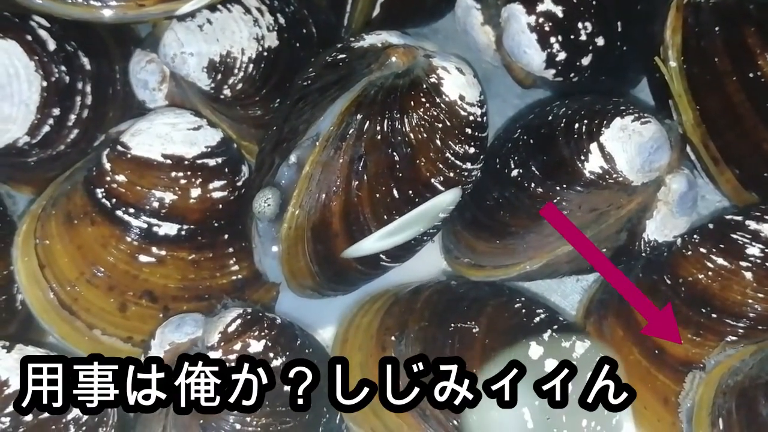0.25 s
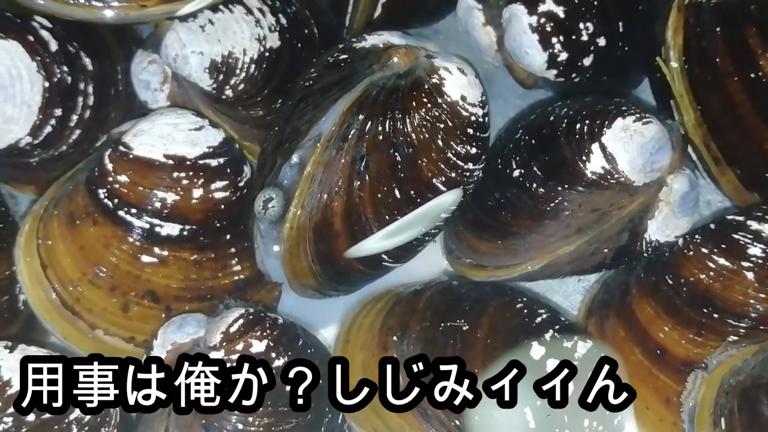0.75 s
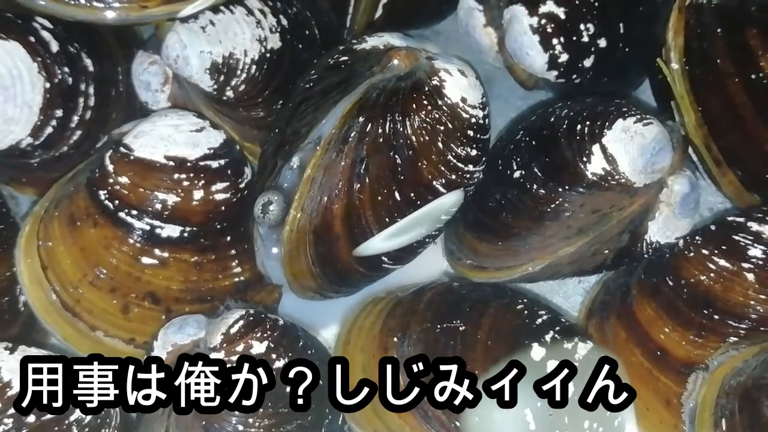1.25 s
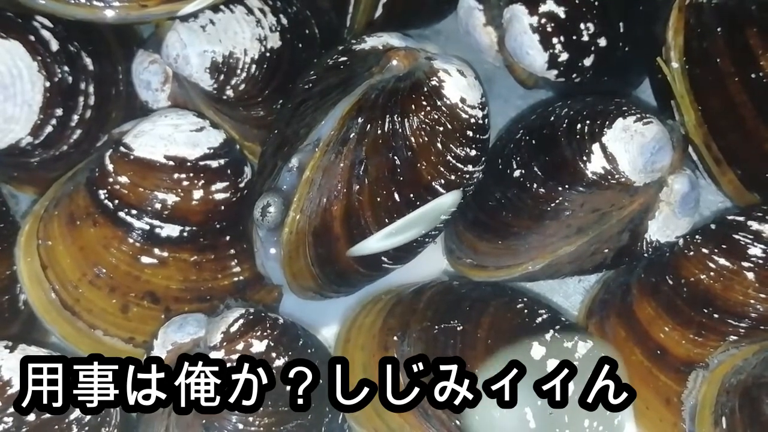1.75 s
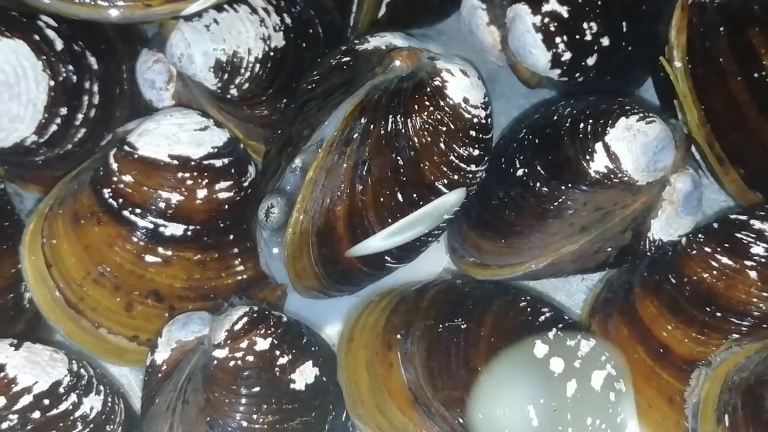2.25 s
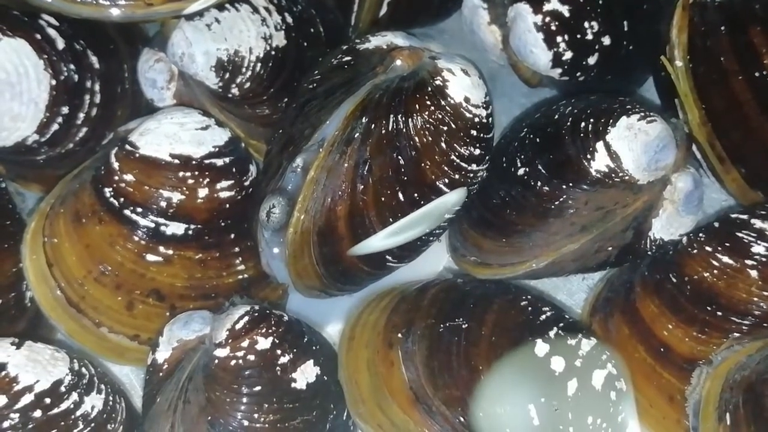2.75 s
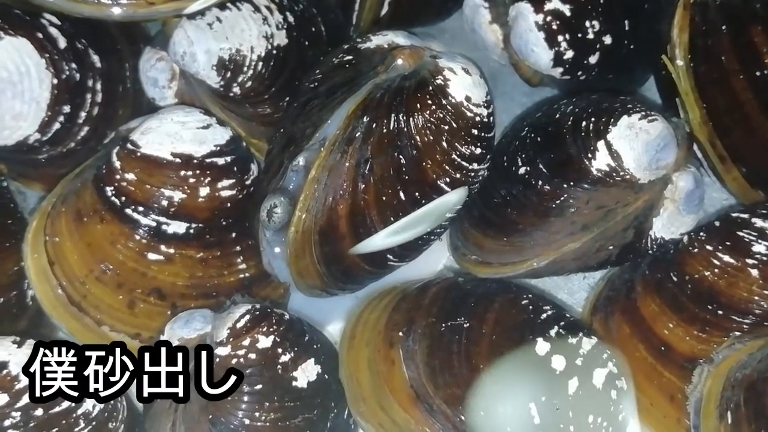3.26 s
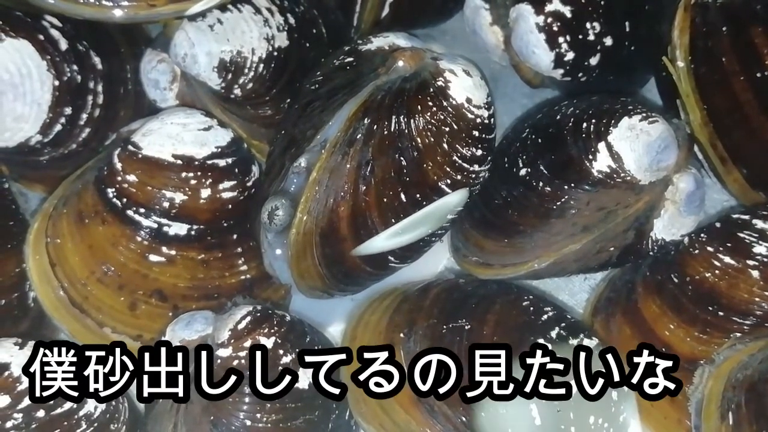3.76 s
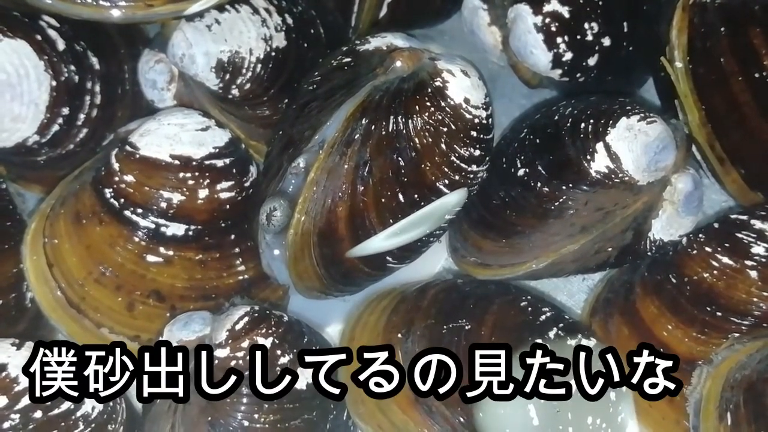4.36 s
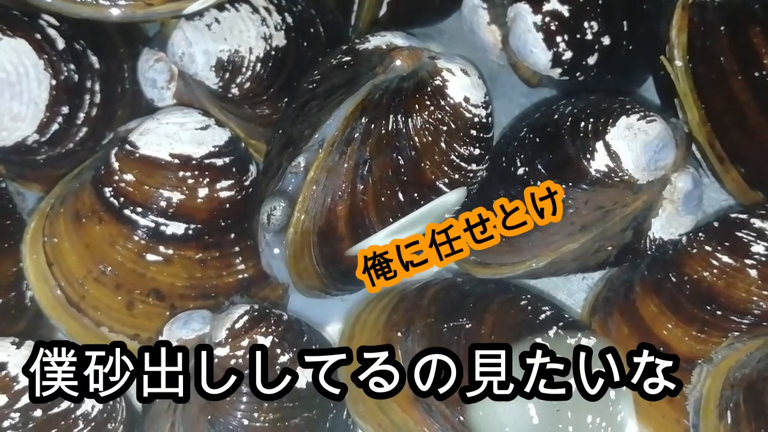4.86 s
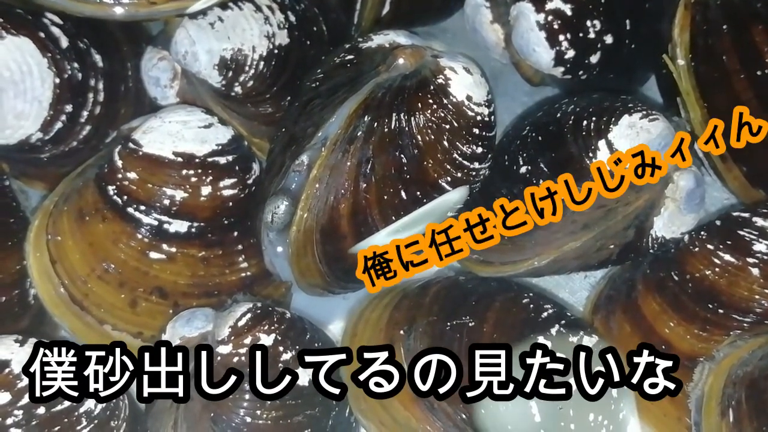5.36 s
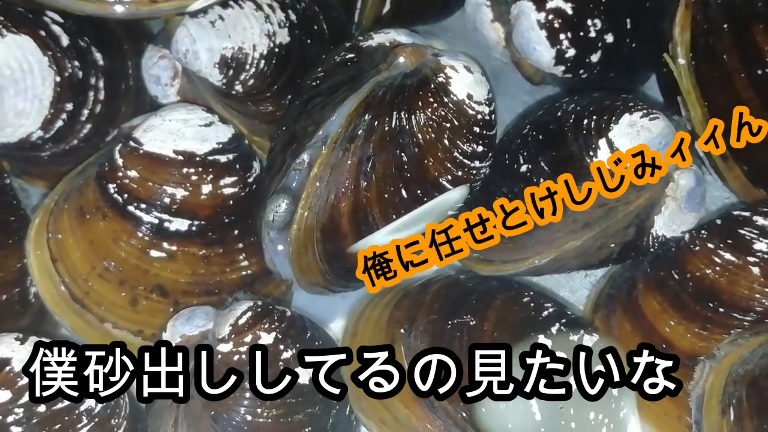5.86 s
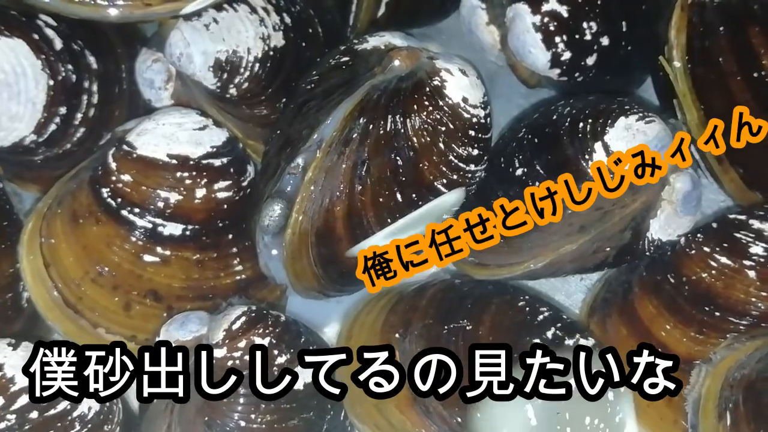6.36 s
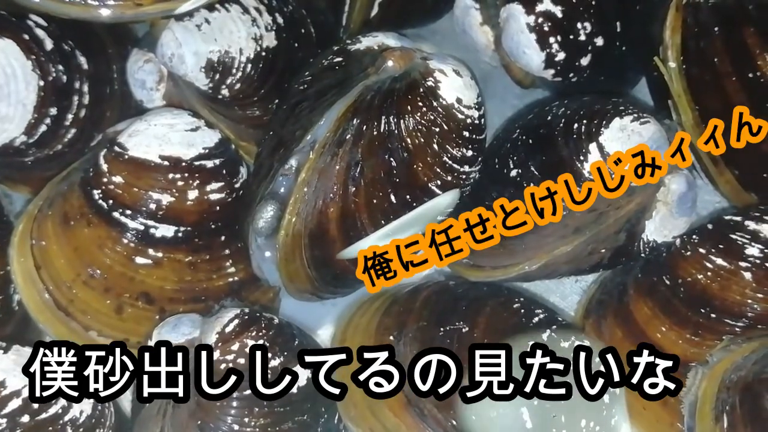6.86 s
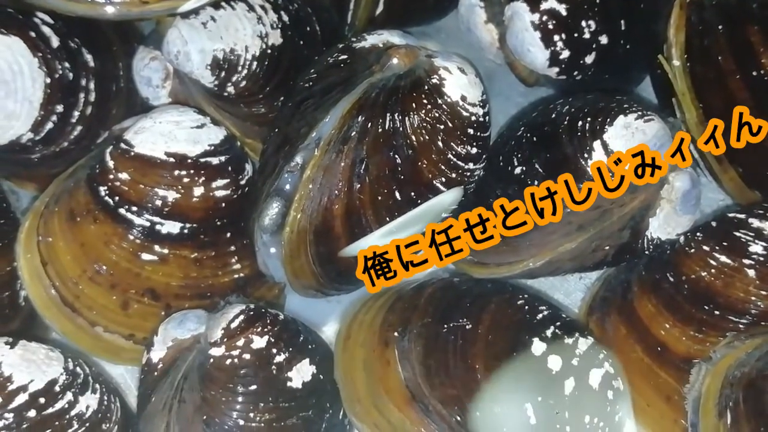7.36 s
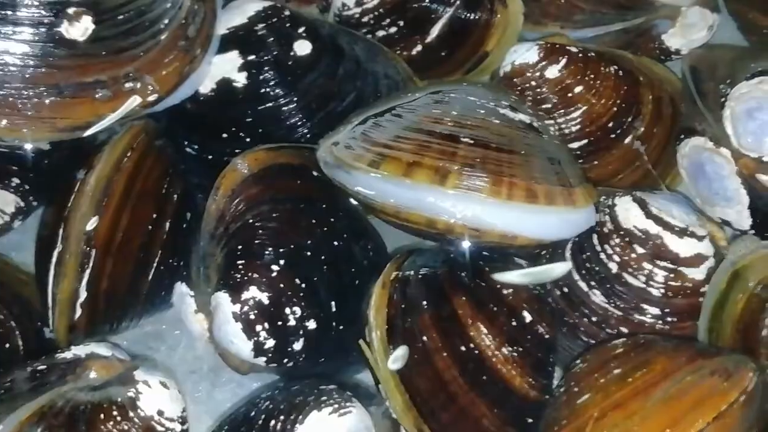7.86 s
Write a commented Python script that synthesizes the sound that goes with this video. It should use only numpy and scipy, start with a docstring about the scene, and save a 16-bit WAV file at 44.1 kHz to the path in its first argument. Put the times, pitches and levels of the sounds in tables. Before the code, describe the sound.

Small clams in shallow water click their shells, plop little bubbles and squirt thin hissing jets in irregular clusters, close up in a small hard room.

```python
"""Clams in shallow water

Small clams lie in a tray of shallow water, a little right of a close stereo microphone.
Shell clicks are noise bursts with damped sines, air pockets are groups of decaying bubble tones,
and water jets are streams of filtered random grains. Decaying noise gives a small hard room's answer;
shaped noise makes the room air, and wavering sines the hum of an appliance."""
import sys
import numpy as np
from scipy import signal
from scipy.fft import rfft, irfft, next_fast_len
from scipy.io import wavfile
from scipy.ndimage import map_coordinates

SR = 44100
rng = np.random.default_rng(int(sys.argv[2]) if len(sys.argv) > 2 else 0)


def transcribe(u):
    """Save the signal u as a 16-bit wav file named by the first command-line argument.

    u: samples, shape (n,) or (channels, n), limited to [-1, 1]; the rate is SR.
    q: integer samples, one column per channel.
    """
    v = np.clip(np.atleast_2d(u).T, -1, 1)
    q = np.round(v * 32767).astype(np.int16)
    wavfile.write(sys.argv[1], SR, q)


N = 358136

# Shell impacts; ring_db is relative to the crack: start_s, level_db, ring_db, pitch_hz
CLICKS = [(0.7437, -42.5, -17, 7400), (0.8165, -30.5, -22, 7400), (1.146, -29.5, -2, 2700),
          (1.4485, -34.5, -2.5, 3060), (1.808, -38.5, 3.5, 3000), (1.831, -28, -4.5, 3300),
          (1.892, -49, 7, 3050), (1.951, -39.5, 7, 2980), (2.0267, -46, 7, 2530), (2.0369, -41, 1, 2700),
          (2.069, -47, 10, 3100), (2.149, -42.5, -8, 1400), (2.23, -38.5, -9, 1000),
          (2.2571, -30.5, -7, 985), (2.364, -35, -3, 1090), (2.442, -11.5, -13, 3120),
          (2.5631, -29.5, -3.5, 3000), (2.822, -36, 0.5, 1880), (3.0852, -49, 5, 980),
          (3.157, -48, -0.5, 2980), (3.3509, -32.5, -15, 2020), (3.6051, -26.5, -19, 2830),
          (3.9562, -23.5, -18, 2150), (4.7465, -61, 20, 4550), (5.0177, -23.5, -6, 2940),
          (5.3285, -36, 2, 2630), (5.348, -33.5, -4, 6800), (5.4204, -29.5, -4, 3300),
          (5.458, -27, -14, 3200), (5.507, -16, -3.5, 7750), (5.6135, -28, -7, 2150),
          (5.7473, -32.5, 4, 1090), (5.8003, -19, -10, 1880), (5.845, -14.5, -5.5, 1830),
          (5.9437, -18.5, -8, 2800), (6.0163, -29, -4, 1850), (6.142, -42.5, -15, 2900),
          (6.204, -42, -6.5, 2940), (6.7836, -34.5, -7, 2800), (7.1435, -32, -2, 2870),
          (7.207, -31, 7, 2920), (7.457, -28.5, 6.5, 8770)]
# Air pockets that break up: start_s, level_db, pitch_hz
PLOPS = [(1.83, -40, 402), (1.966, -33, 910), (2.187, -35.5, 440), (2.303, -28.5, 930), (2.496, -32, 974),
         (2.581, -27, 730), (3.157, -32.5, 927), (3.352, -33, 584), (3.831, -32, 900), (4.7491, -19, 750),
         (5.56, -34.5, 408), (5.745, -26, 1030), (5.942, -28.5, 840), (6.067, -26.5, 903), (6.66, -43, 750),
         (6.797, -36, 770), (7.347, -20, 1030), (7.352, -35, 358)]
# Spectrum of shell contacts: frequency_hz, level_db
SHELL_SPECTRUM = [(200, -28), (900, -3.5), (1800, -9), (3100, -2.5), (4100, -2.5), (5700, -1.5), (7400, 6),
                  (8800, 0), (10200, -8.5), (13000, -20.5), (16000, -36)]
# Likeness of the diffuse sound at the two ports: frequency_hz, likeness
PORT_LIKENESS = [(50, 1), (160, 0.94), (300, 0.63), (700, 0.026)]
CLICK_DB = -26  # an ordinary click, from which room share and squeezed spurts are scaled


def amp(db):
    """Amplitude ratio: 20 dB is a factor of ten."""
    return 10 ** (np.asarray(db) / 20)


def unit(x):
    """Normalisation to a root-mean-square value of 1."""
    return x / np.sqrt(np.mean(x ** 2) + 1e-20)


def along(points, hz):
    """Linear interpolation of (frequency, value) points on a logarithmic frequency axis."""
    point_hz, values = np.transpose(points)
    return np.interp(np.log(hz + 1), np.log(point_hz + 1), values)


def wobble(rate):
    """Slow random modulation: a smooth curve through rate random knots a second."""
    knots = rng.standard_normal(int(N * rate / SR) + 4)
    return map_coordinates(knots, [np.arange(N) * rate / SR])


def add(track, s, x):
    """Superposition: sound x joins the track from time s."""
    part = track[..., round(s * SR):][..., :x.shape[-1]]
    part += x[..., :part.shape[-1]]


def filtered(x, response):
    """Linear filtering: the spectrum of x is multiplied by a response of frequency."""
    size = next_fast_len(N + 8192)
    hz = np.fft.rfftfreq(size, 1 / SR)
    return irfft(rfft(x, size) * response(hz), size)[..., :N]


def impulse(points, size=512):
    """Minimum phase: folding the cepstrum gives a causal impulse response with a given spectrum."""
    level = amp(along(points, np.fft.rfftfreq(size, 1 / SR)))
    cepstrum = irfft(np.log(level))
    cepstrum[1:size // 2] *= 2
    cepstrum[size // 2 + 1:] = 0
    return irfft(np.exp(rfft(cepstrum)))


def grains(spectrum, per_second, spread_db):
    """Shot noise: random tiny bursts of uneven size sum to a texture of rms 1."""
    hits = (rng.random(N) < per_second / SR) * rng.choice([-1, 1], N)
    sizes = amp(spread_db * np.clip(rng.standard_normal(N), -2, 2))
    return unit(signal.oaconvolve(hits * sizes, impulse(spectrum))[:N])


def ports(x, size=26):
    """Path difference: sound from the tray reaches the left port size samples after the right."""
    left = np.pad(x, (size, 0))[:len(x)]
    return np.array([left, x])


def room(x, shared=0.023, early=1.0, early_s=0.098):
    """Reverberation: strong near walls, then a diffuse tail whose bass is alike at both ports."""
    # Reverberation time of the small hard room: frequency_hz, t60_s
    decay_times = [(200, 0.41), (1300, 0.29), (3500, 0.3), (9000, 0.2), (15000, 0.31)]
    hz, t, noise = signal.stft(rng.standard_normal((3, SR // 2)), SR, nperseg=256)
    decay = amp(-60 * t / along(decay_times, hz)[:, None])
    fade = decay * (1 + early * np.exp(-(t / early_s) ** 2))
    share = np.clip(np.maximum(shared, along(PORT_LIKENESS, hz)), 0, 1)[:, None]
    weights = np.sqrt([1 - share, 1 - share, share])
    tails = signal.istft(noise * fade * weights, SR, nperseg=256)[1]
    tail = ports(tails[2]) + tails[:2]
    tail = tail * (1 - np.exp(-np.arange(tail.shape[1]) / SR / 0.00033))  # soft onset
    return signal.fftconvolve(x[None], tail / np.linalg.norm(tail[0]), axes=1)


def background():
    """Partial coherence: room air is alike at both ports in the bass; an appliance's hum wavers."""
    # Spectrum of the room air: frequency_hz, level_db
    air_spectrum = [(25, -16.5), (52, -4.5), (120, -13.5), (153, -8), (180, -12), (235, -6), (280, -15),
                    (620, -25), (1400, -17), (1750, -21.5), (2500, -24.5), (2950, -23.5), (3800, -31),
                    (5500, -33.5), (7000, -31), (8900, -33.5), (10200, -44), (16000, -49.5)]
    # Partials of the hum: frequency_hz, level_db
    hum_partials = [(49.8, -63.5), (152, -61.5), (243, -65.5)]

    def mid_side(hz):
        turn = np.arccos(np.clip(along(PORT_LIKENESS, hz), -1, 1)) / 2
        return amp(along(air_spectrum, hz)) * [np.cos(turn), np.sin(turn)]

    mid, side = filtered(rng.standard_normal((2, N)), mid_side)
    air = amp(-54.5) * unit(np.array([mid + side, mid - side]))
    t = np.arange(N) / SR
    hum = np.zeros(N)
    for hz, db in hum_partials:
        level = amp(db + 4.8 * wobble(4.5))
        hum += level * np.sin(2 * np.pi * hz * t + 0.56 * wobble(8.3))
    return air + hum


def clicks():
    """Impact: a shell snaps against its neighbour in a brief scrape of contacts and a damped ring."""
    ring_cycles = 10  # cycles in which the ring decays by 60 dB
    room_db, buried = 2, 0.096  # room level; dB more room per dB fainter: faint clicks lie deeper in the pile
    out = np.zeros((2, N))
    t = np.arange(SR // 25) / SR
    for s, db, ring_db, hz in CLICKS:
        scrape = amp(-60 * t / 0.012) * (1 - np.exp(-t / 0.0007))
        contacts = rng.choice([-1, 1], len(t)) * scrape
        crack = np.convolve(contacts, impulse(SHELL_SPECTRUM))[:len(t)]
        ring = amp(-60 * t * hz / ring_cycles) * np.sin(2 * np.pi * hz * t)
        ring = ring * (1 - np.exp(-t / 0.0005))
        crack = crack / np.linalg.norm(crack)
        ring = ring / np.linalg.norm(ring)
        snap = amp(db + 16) * (crack + amp(ring_db) * ring)
        add(out, s, ports(snap, size=16) * amp([[-1.3], [1.3]]))  # stronger on the right
        add(out, s, amp(room_db - buried * (db - CLICK_DB)) * room(snap))
    return out


def jets(t):
    """Pressure-driven flow: each steady jet opens quickly, gains pressure and is shut off."""
    # Thin steady jets, each with its level at the end: start_s, end_s, level_db
    steady_jets = [(0.748, 0.89, -67), (0.9, 1.182, -52.5), (1.32, 1.488, -59), (1.45, 1.92, -54.5),
                   (2.612, 2.721, -55), (4.864, 5.303, -53.5), (5.42, 5.96, -49.5), (6.066, 6.165, -58),
                   (6.252, 6.439, -55), (6.727, 7.235, -49), (6.841, 7.027, -48), (7.226, 7.484, -38.5)]
    attack_s, release_s, swell_db_per_s = 0.021, 0.012, 15  # a jet grows until the siphon closes
    flow = np.zeros(N)
    for start, end, db in steady_jets:
        opening = np.clip((t - start) / attack_s, 0, 1)
        swelling = amp(db - swell_db_per_s * np.maximum(end - t, 0))
        closing = np.exp(-np.maximum(t - end, 0) / release_s)
        flow += opening * swelling * closing
    return flow


def spurts():
    """Displacement: individual spurts, one squeezed out by each click, one refilling each air pocket.

    Each is (crest s, spray dB, rise s, fall s, wetness dB)."""
    # Individual spurts, some right after a click; wetness_db is gurgle over spray:
    # crest_s, spray_db, fall_s, wetness_db
    individual_spurts = [(0.824, -49.5, 0.15, -6), (1.093, -43, 0.1, -15.5), (1.173, -30.5, 0.015, -14.5),
                         (1.517, -44, 0.033, -8.5), (1.664, -43, 0.046, -6), (1.774, -37, 0.029, -16.5),
                         (1.835, -44, 0.016, 4), (1.897, -46, 0.041, 0), (2.041, -48.5, 0.069, -1),
                         (2.151, -48, 0.031, 6), (2.411, -49.5, 0.063, -1), (2.505, -35, 0.021, -9.5),
                         (2.587, -40, 0.028, -5), (2.851, -54, 0.097, -1), (3.215, -58.5, 0.074, 3.5),
                         (3.36, -42, 0.01, -28), (3.616, -30.5, 0.0089, -27), (4.762, -68, 0.0091, 20),
                         (4.97, -48.5, 0.097, -10), (5.022, -26, 0.01, -13.5), (5.222, -41, 0.04, -3.5),
                         (5.476, -36.5, 0.047, -6.5), (5.604, -37, 0.059, -5), (5.633, -25.5, 0.012, -8),
                         (5.755, -36, 0.013, 2.5), (5.82, -42, 0.022, 7), (5.853, -24.5, 0.0049, -7.5),
                         (5.962, -42, 0.0059, 9.5), (6.01, -48, 0.034, 6.5), (6.324, -51, 0.033, -5.5),
                         (6.53, -61.5, 0.17, -13), (7.347, -29, 0.026, -11.5)]
    rise_share = 0.57  # rise time of an individual spurt as a share of its fall time
    sudden_rise_s = 0.0011  # rise of a spurt squeezed out by a click or refilling a pocket
    lag_s, squeeze_fall_s, squeeze_wet_db = 0.0067, 0.019, -3.5  # crest after the click
    squeeze_db, squeeze_grows = -47.5, 0.41  # spray at an ordinary click; dB more spray per dB of click
    refill_db, refill_fall_s, refill_wet_db = -34, 0.017, 17.5  # spray relative to the plop
    found = []
    for s, db, fall, wet_db in individual_spurts:
        found.append((s, db, rise_share * fall, fall, wet_db))
    for s, db, _, _ in CLICKS:
        spray_db = squeeze_db + squeeze_grows * (db - CLICK_DB)
        found.append((s + lag_s, spray_db, sudden_rise_s, squeeze_fall_s, squeeze_wet_db))
    for s, db, _ in PLOPS:
        found.append((s, db + refill_db, sudden_rise_s, refill_fall_s, refill_wet_db))
    return found


def flows(t, steady):
    """Incoherent addition: jets and spurts add in power to the spray and to the churning water."""
    power = np.outer(amp([0, -16.5]) ** 2, steady ** 2)  # a thin jet hardly stirs the water
    for s, db, rise, fall, wetness_db in spurts():
        crest = round(s * SR)
        near = slice(max(crest - SR // 2, 0), crest + SR // 2)
        age = t[near] - s
        spurt = amp(db) * np.exp(-np.where(age < 0, (age / rise) ** 2, np.abs(age / fall)))
        power[:, near] += np.array([spurt, spurt * amp(wetness_db)]) ** 2
    return np.sqrt(power)


def drips(splashing):
    """Bubble resonance: stray drops fall back and ring briefly, in proportion to the splash."""
    per_second, level_db, spread_db = 42, 22, -1.5  # level relative to the splash
    centre_hz, scatter_octaves = 2700, 0.27
    out = np.zeros(N)
    t = np.arange(SR // 40) / SR
    for _ in range(int(per_second * N / SR)):
        s = rng.uniform(0, (N - 1) / SR)
        pitch, size = rng.standard_normal(2)
        hz = np.clip(centre_hz * 2 ** (scatter_octaves * pitch), 1500, 5000)
        ring = np.sin(2 * np.pi * hz * t) * amp(-60 * t * hz / 9) * (1 - np.exp(-t * hz))
        level = amp(level_db + spread_db * np.clip(size, -2, 2))
        add(out, s, splashing[int(s * SR)] * level * ring)
    return out


def water():
    """Atomisation and splashing: jets throw fine spray; wetter spurts splash and gurgle more."""
    # Spectrum of the spray: frequency_hz, level_db
    spray_spectrum = [(1500, -33), (4200, -4), (5800, -1.5), (7200, 1), (9100, 1), (10300, -13),
                      (13000, -23.5), (16000, -34)]
    # Spectrum of the finest drops: frequency_hz, level_db
    mist_spectrum = [(3500, -11), (5600, -7), (7000, 2), (9300, 5), (10300, -15), (13000, -11.5),
                     (16000, -29)]
    # Spectrum of middle-sized drops: frequency_hz, level_db
    splash_spectrum = [(500, -24.5), (1300, -10.5), (1900, 0), (3000, 4), (4200, -3), (7000, -9),
                       (12000, -69)]
    # Spectrum of the churning water: frequency_hz, level_db
    gurgle_spectrum = [(110, -24), (220, 5), (370, 1), (500, -4.5), (680, -1.5), (1050, 3), (1800, -2),
                       (12000, -81)]
    mist_db, mist_grows, jet_db = -1.5, 0.23, -49  # mist over a jet of jet_db; dB more per dB of jet
    t = np.arange(N) / SR
    steady = jets(t)
    fizz, churn = flows(t, steady)
    spray = fizz * amp(3.4 * wobble(77)) * grains(spray_spectrum, per_second=3000, spread_db=3.5)
    # a harder jet atomises more
    misting = steady * amp(mist_db) * (steady / amp(jet_db)) ** mist_grows
    mist = misting * grains(mist_spectrum, per_second=3400, spread_db=6)
    # middle-sized drops need both a fast jet and plenty of water
    splashing = np.sqrt(fizz * churn)
    splash_level = splashing * amp(1.0 + 0.32 * wobble(110))
    splash = splash_level * grains(splash_spectrum, per_second=700, spread_db=4.5)
    droplets = splashing * amp(-3) * grains(splash_spectrum, per_second=70, spread_db=3)
    gurgle_level = churn * amp(2.0 + 5.7 * wobble(55))
    gurgle = gurgle_level * grains(gurgle_spectrum, per_second=500, spread_db=3)
    ticks = fizz * amp(-7) * grains(SHELL_SPECTRUM, per_second=80, spread_db=3)
    # single drops land on top of the shells, in plain view of the microphone
    spatter = droplets + ticks + drips(splashing)
    thrown = spray + mist + splash
    wet = thrown + spatter + gurgle
    out = amp(-8.0) * (ports(thrown) + ports(gurgle, size=16))
    out = out + amp(-3.5) * ports(spatter)
    # a fresh random room tail every sixth of a second keeps the reverberation from ringing at fixed pitches
    size = SR // 6
    for start in range(0, N, size):
        add(out, start / SR, amp(-3.0) * room(wet[start:start + size]))
    return out


def bubble(hz):
    """Volume pulsation: a bubble opens with a soft wet smack and rings, its pitch sagging."""
    t = np.arange(SR // 16) / SR
    pitch = hz * np.exp(-t / 0.21)
    swell = (1 - np.exp(-t / 0.002)) * amp(-60 * t * hz / 19)  # decays by 60 dB in 19 cycles
    ring = np.sin(2 * np.pi * np.cumsum(pitch) / SR)
    band = signal.butter(4, [hz * 0.7, hz * 2.4], "band", fs=SR)
    smack = signal.lfilter(*band, rng.standard_normal(len(t)))
    return swell * (ring + 0.4 * unit(smack))


def plops():
    """Bubble size sets pitch: a pocket breaks into a main bubble, a smaller and a larger one."""
    # Bubbles of one pocket: delay_s, pitch_ratio, level_db
    pocket_bubbles = [(0, 0.994, 1.5), (.010, 1.91, -5.5), (.016, 0.499, -11)]
    out = np.zeros((2, N))
    for s, db, hz in PLOPS:
        plop = np.zeros(SR // 10)
        for delay, ratio, level_db in pocket_bubbles:
            add(plop, delay, amp(db + 2.0 + level_db) * bubble(hz * ratio))
        add(out, s, ports(plop, size=16))
        add(out, s, amp(-5.0) * room(plop))
    return out


def scene():
    """Spectral colouration: each port colours the sound from the tray in its own way."""
    # Level of the left port over the right: frequency_hz, difference_db
    port_tilt = [(200, 3), (500, -4.5), (1000, -0.5), (2000, 1.5), (4000, -5), (6800, -9), (8800, 0),
                 (11500, -5)]
    tray = clicks() + plops() + water()
    coloured = filtered(tray, lambda hz: amp(np.outer([0.5, -0.5], along(port_tilt, hz))))
    return coloured + background()


def record(dry):
    """Band limitation: nothing from the top frequency upwards is kept."""
    top_hz = 15850
    return filtered(dry, lambda hz: hz < top_hz)


dry = scene()
out = record(dry)
transcribe(out)
```